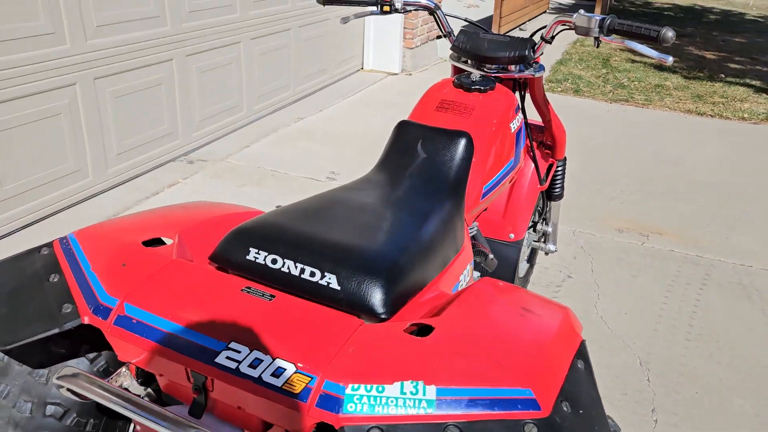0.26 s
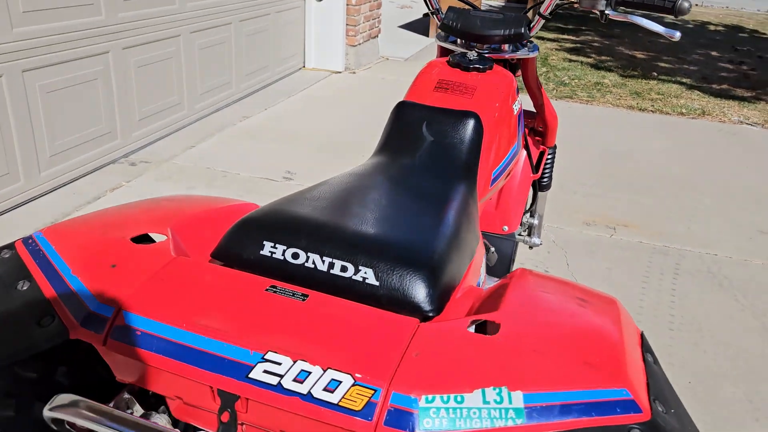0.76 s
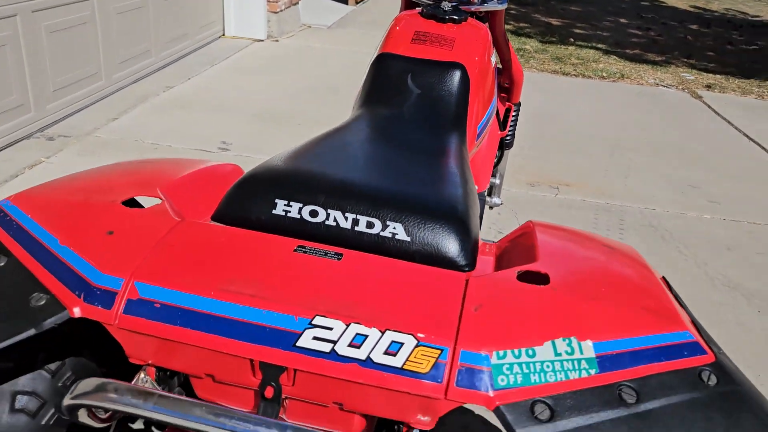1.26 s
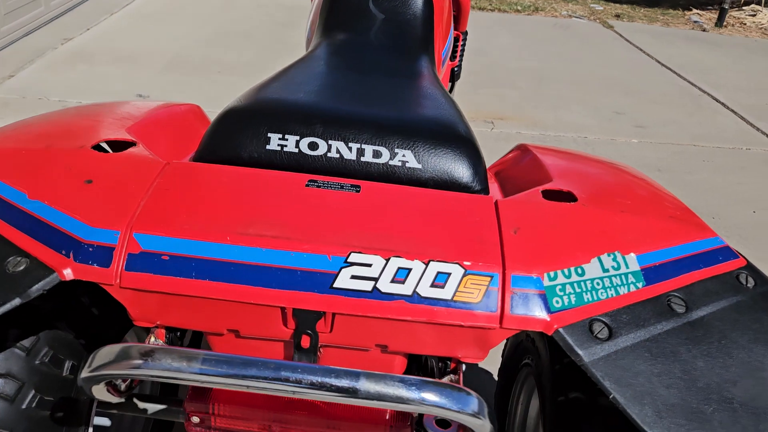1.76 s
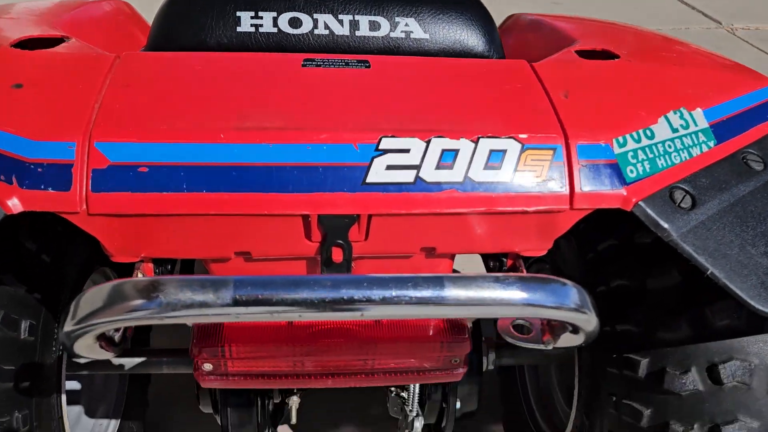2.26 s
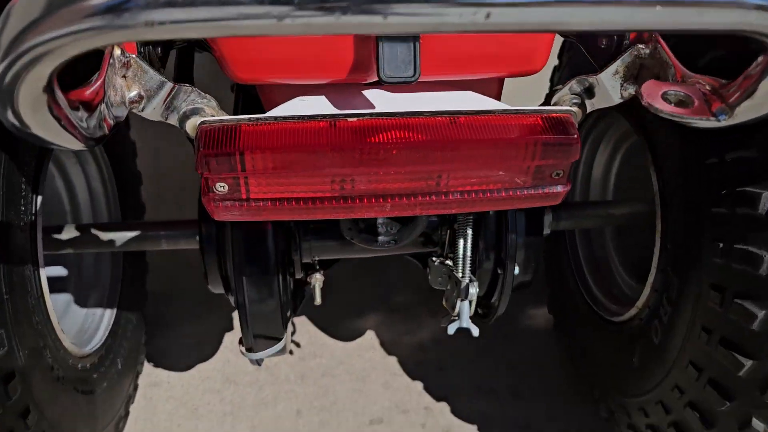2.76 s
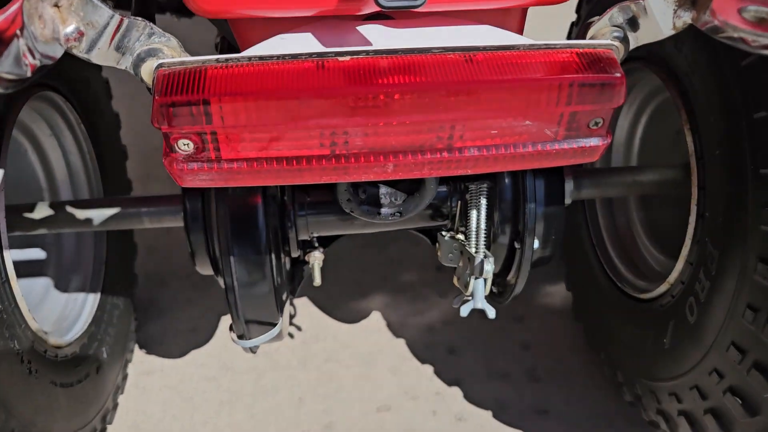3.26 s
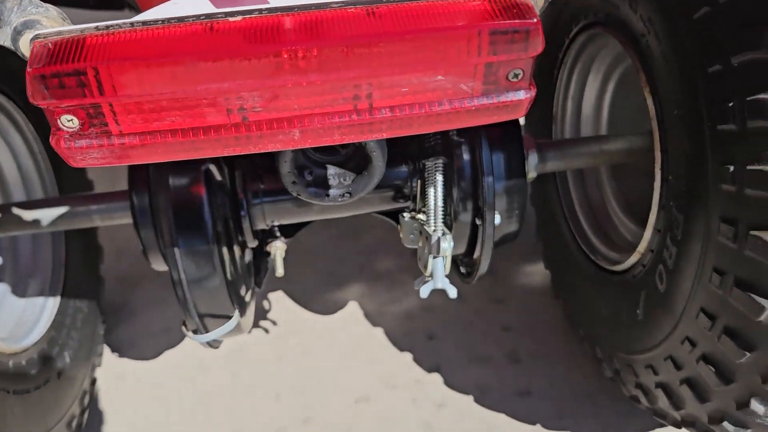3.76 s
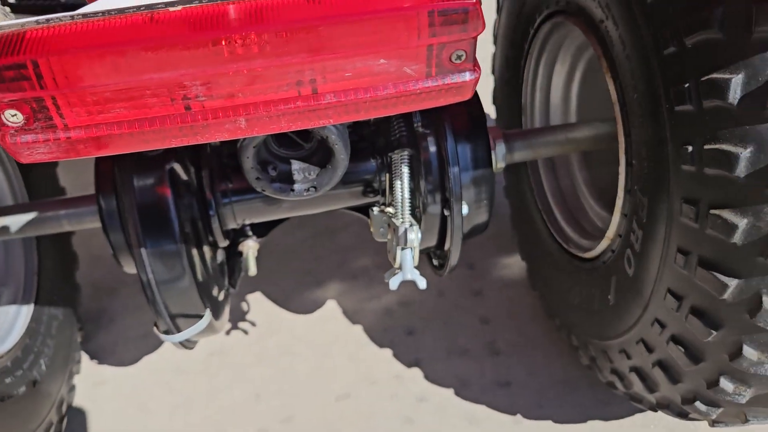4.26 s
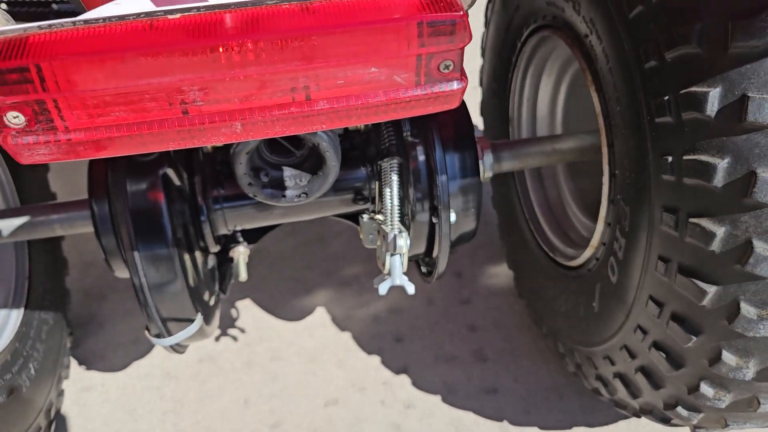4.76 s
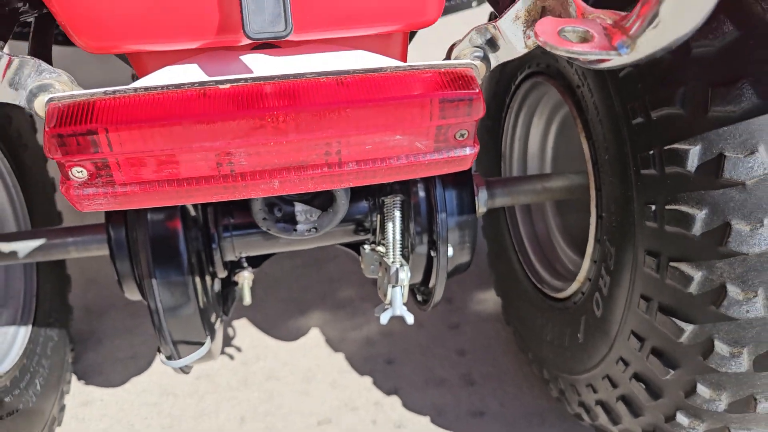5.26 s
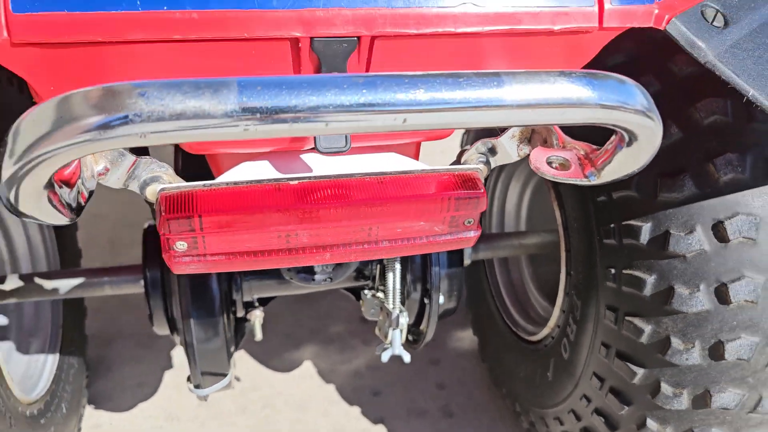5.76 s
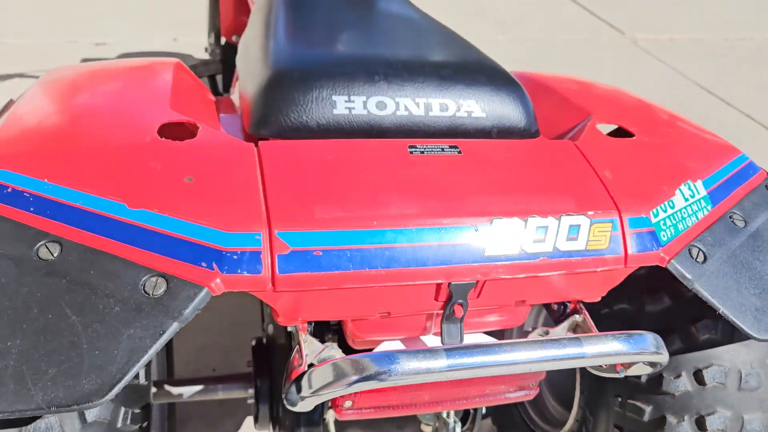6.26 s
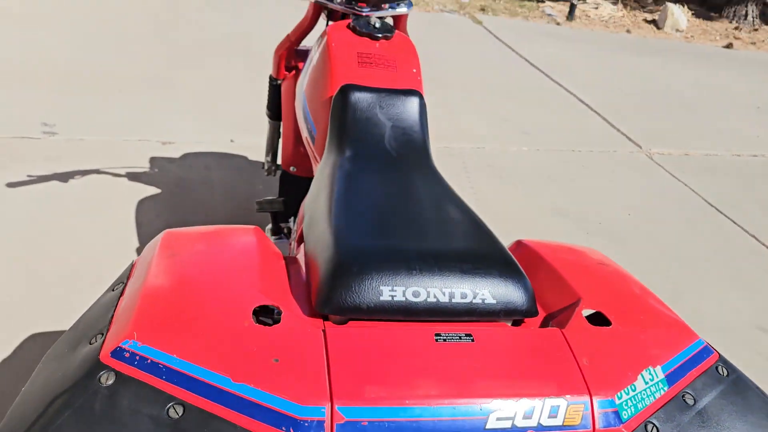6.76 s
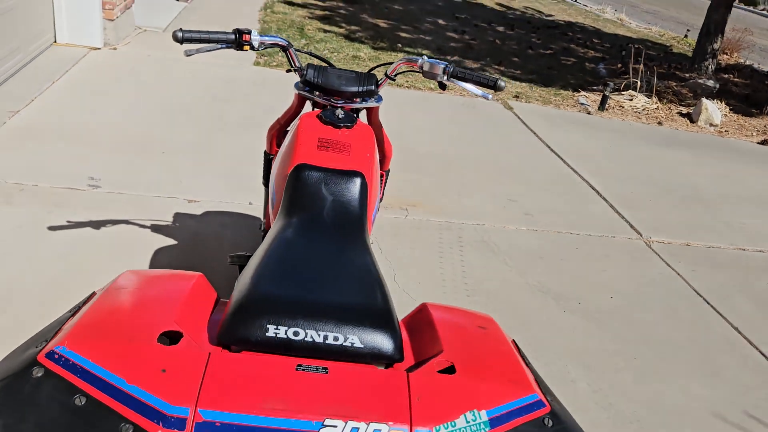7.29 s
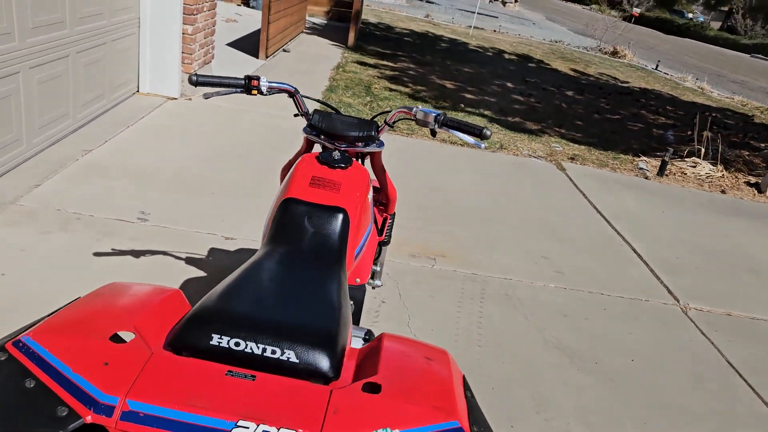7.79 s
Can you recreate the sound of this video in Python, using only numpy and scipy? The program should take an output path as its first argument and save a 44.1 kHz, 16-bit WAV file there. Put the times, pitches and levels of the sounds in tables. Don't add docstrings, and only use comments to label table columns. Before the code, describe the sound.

A small single-cylinder four-stroke engine idles on a concrete drive, its exhaust puttering about thirteen times a second. Each stroke is a double puff with a burst of hiss, over a ticking valve gear and low case rumble. The handheld microphone dips low behind it, where the hiss and snap brighten, then pulls back up. A few uneven strokes pop softly. A faint deep breeze lies beneath.

```python
import sys
import numpy as np
from scipy import signal
from scipy.fft import rfft, irfft, next_fast_len
from scipy.io import wavfile
from scipy.ndimage import uniform_filter1d, map_coordinates

SR = 44100
rng = np.random.default_rng(int(sys.argv[2]) if len(sys.argv) > 2 else 0)


def gain_from_decibels(decibels):
    exponent = np.asarray(decibels, float) / 20
    return 10 ** exponent


def master(y):
    cut = np.clip(np.atleast_2d(y).T, -1, 1)
    pcm = np.round(cut * 32767)
    wavfile.write(sys.argv[1], SR, pcm.astype(np.int16))


N = 354123


def unit(x):
    return x / np.sqrt(np.mean(x ** 2) + 1e-20)


def along(points, hz):
    point_hz, value = np.transpose(points)
    return np.interp(np.log(hz + 1), np.log(point_hz + 1), value)


def filtered(x, response):
    size = next_fast_len(N + SR // 2)
    spectrum = rfft(x, size) * response(np.fft.rfftfreq(size, 1 / SR))
    return irfft(spectrum, size)[..., :N]


def impulses(seconds, sizes):
    at = np.asarray(seconds) * SR
    whole = at.astype(int)
    part = at - whole
    shares = np.r_[sizes * (1 - part), sizes * part]
    return np.bincount(np.r_[whole, whole + 1], shares, N + SR)[:N]


# pitch_hz, share of power 0-1
COMMON_NOISE = [(100, 0.98), (600, 0.66), (1400, 0.69), (3000, 0.057), (15000, 0.067)]


def rush(spectrum):
    common, left, right = rng.standard_normal((3, N))
    share = lambda hz: np.clip(along(COMMON_NOISE, hz), 0, 1)
    colour = lambda hz: gain_from_decibels(along(spectrum, hz))
    same = filtered(common, lambda hz: colour(hz) * np.sqrt(share(hz)))
    own = filtered(np.array([left, right]), lambda hz: colour(hz) * np.sqrt(1 - share(hz)))
    return unit(same + own)


def wobble(rate):
    knots = rng.standard_normal(int(N * rate / SR) + 4)
    return map_coordinates(knots, [np.arange(N) * rate / SR])


def banded(x, depth_db):
    width_hz, life_s = 60, .12
    hz, t, z = signal.stft(x, SR, nperseg=2048)
    field = rng.standard_normal(z.shape[1:])
    field = uniform_filter1d(field, round(width_hz / hz[1]), 0)
    field = uniform_filter1d(field, round(life_s / t[1]), 1)
    return unit(signal.istft(z * gain_from_decibels(depth_db * unit(field)), SR, nperseg=2048)[1][:, :N])


def ring(times, sizes_db, modes, scatter_db, rise_s, unlike):
    t, out = np.arange(SR // 8) / SR, np.zeros((2, N))
    chance = rng.standard_normal((len(times), len(modes)))
    shift = unlike * rng.standard_normal(len(modes))
    for k, (hz, db, t60) in enumerate(modes):
        blows = impulses(times, gain_from_decibels(sizes_db + db + scatter_db * chance[:, k]))
        envelope = gain_from_decibels(-60 * t / t60) * (1 - np.exp(-t / rise_s))
        mode = envelope * np.sin(2 * np.pi * hz * t + [[0], [shift[k]]])
        out += signal.oaconvolve(blows[None], mode, axes=1)[:, :N]
    return out


# time_s, nearness_db, line of sight into the tail_db, top pipe modes past the fender_db
PHONE_MOVES = [(0, -.5, -2.5, 5), (.6, 0.5, -3, 2.3), (1.1, 0.44, -1.5, 0.3), (2, 1.08, -1, 1),
               (2.7, 1.5, 2, -1), (3.3, 1, 2, -1), (4.1, 0.5, 3, 2), (4.9, 0.2, 3, 1), (5.7, -0.2, 0, -0.5),
               (6.1, 0, -1.5, -3.5), (6.7, 0, -5, -8), (7.1, 0.1, -3.5, 1), (8.03, .7, -3, 6)]


def phone(seconds):
    s, *columns = np.transpose(PHONE_MOVES)
    return [np.interp(seconds, s, column) for column in columns]


# time_s, crank_turns_per_minute
IDLE_SPEED = [(0.0, 1569.8), (0.25, 1555.3), (1.34, 1365.8), (1.4, 1440.3), (2.06, 1498.3), (2.53, 1513.3),
              (2.53, 1564.4), (3.45, 1597.6), (3.46, 1577.6), (4.47, 1591.9), (4.88, 1567.5), (4.9, 1615.0),
              (5.67, 1542.1), (5.78, 1599.4), (6.43, 1595.6), (6.61, 1535.0), (7.4, 1526.7), (8.03, 1525.5)]
# start_s, level_db, weakness 0-1
WEAK_POPS = [
    (0.739, -8, 0.18),
    (1.579, -9.5, 0.74),
    (3.532, -18, 0.56),
    (5.196, -16, 0.26),
    (6.034, -35, 0.75),
    (6.334, -7.5, 0.95),
    (6.718, -8.5, 0.52),
    (7.344, -32, 0.4),
    (7.738, -36, 0.52),
]


def strokes():
    first_s, early_s, next_late_s = .0181, .00166, .00095
    t = np.arange(N) / SR
    cycles = np.cumsum(np.interp(t, *np.transpose(IDLE_SPEED))) / (120 * SR)
    cycles -= np.interp(first_s, t, cycles)
    s = np.interp(np.arange(int(cycles[-1]) + 1), cycles, t)
    pop_s, _, weakness = np.transpose(WEAK_POPS)
    weak = np.zeros(len(s))
    weak[np.searchsorted(s, pop_s) - 1] = weakness
    times = s - early_s * weak + next_late_s * np.roll(weak, 1)
    return times, 1000 * np.gradient(s), weak


def crank(lead_s):
    s = strokes()[0] - lead_s
    s = np.r_[2 * s[0] - s[1], s, 2 * s[-1] - s[-2]]
    return s, np.interp(np.arange(N) / SR, s, np.arange(len(s)))


# pitch_hz, level_db per Hz
AIR_COLOUR = [(15, -24), (30, 0), (40, 6), (55, -10), (90, -70.5)]


def breeze():
    return gain_from_decibels(-30 + 2.5 * wobble(1.04)) * rush(AIR_COLOUR)


# pitch_hz, level_db per Hz
CASE_COLOUR = [(30, -6), (139, -6.5), (201, -12), (248, -23.5), (368, -16), (519, -17), (792, -29),
               (904, -23), (2670, -33.5), (7470, -39), (12200, -47), (16500, -74)]


def case_rumble(near_db):
    drone = banded(rush(CASE_COLOUR), depth_db=3.1)
    return gain_from_decibels(-34 + 1.2 * near_db + 1.25 * wobble(30)) * drone


# start_s, peak_db
LOOSE_KNOCKS = [
    (6.203, -27),
]
# pitch_hz, level_db, t60_s
LOOSE_RING = [(6175, -8, .03), (7970, 0, .03), (8120, -3, .02)]


def loose_part():
    return ring(*np.transpose(LOOSE_KNOCKS), LOOSE_RING, scatter_db=-0.5, rise_s=0.0012, unlike=0.46)


# share of cycle 0-1, level_db
GEAR_TICKS = [(0.028, -3.5), (0.098, 2), (.24, 4), (.36, -4), (.46, 5), (.56, -3), (0.779, -1), (.9, -3)]
# pitch_hz, level_db, t60_s
ROCKER_RING = [(3700, -5, .05), (4330, -3, .07), (4420, 1.5, .08), (7340, -1.5, .07), (8050, -.5, .055)]
# pitch_hz, level_db, t60_s
COVER_RING = [(455, 2, .12), (915, 0, .05), (1085, 0, .045), (1360, -5, .05), (1540, -6, .05),
              (2250, -10, .06)]


def valve_gear(modes):
    starts = crank(.002)[0]
    share, db = np.transpose(GEAR_TICKS)
    chance = rng.standard_normal((len(starts) - 1, len(GEAR_TICKS), 2))
    times = starts[:-1, None] + np.diff(starts)[:, None] * (share + .03 * chance[..., 0])
    times = np.clip(times, 0, N / SR).ravel()
    sizes_db = (db + 3.3 * chance[..., 1]).ravel()
    return unit(ring(times, sizes_db, modes, scatter_db=2.5, rise_s=.0012, unlike=.6))


# pitch_hz, level_db, t60_s
CAP_RING = [(5900, -1, .007), (6900, 0, .006)]


def tail_cap():
    s = strokes()[0]
    return unit(ring(s, 0 * s, CAP_RING, scatter_db=-0.5, rise_s=0.00057, unlike=1.3))


# share of cycle 0-1, level_db
TAIL_OUTFLOW = [(0, -13), (.006, 0.5), (.04, 0.5), (.18, -0.5), (.21, -5.5), (.32, -3.5), (.5, -13),
                (.58, -12), (.8, -9), (.97, -20)]
# pitch_hz, level_db per Hz
JET_COLOUR = [(1500, -27), (3000, -12.5), (4500, 3), (6000, 5.5), (8000, 5), (12000, 7.5), (16500, 0)]


def jet():
    turns = crank(0.00093)[1]
    share, db = np.transpose(TAIL_OUTFLOW)
    s, _, weak = strokes()
    each_db = -40 + phone(s)[1] - 7 * weak + .8 * rng.standard_normal(len(s))
    stroke_db = np.pad(each_db, (1, 2), "edge")[turns.astype(int)]
    hiss = banded(rush(JET_COLOUR), depth_db=2.2)
    return gain_from_decibels(np.interp(turns % 1, share, db) + stroke_db + 1.5 * wobble(250)) * hiss


GURGLE_GROWS = 1.6
# delay_s, level_db
PRESSURE_FRONTS = [(.0065, -36.5), (.0145, -38.5), (.0215, -36.5)]
# pitch_hz, level_db, t60_s
BARK_RING = [(918, 0, .042), (1083, 1.5, 0.043), (1360, -2.5, 0.032), (1551, -3, .03), (2100, -9, 0.022)]


def bark():
    s = strokes()[0]
    delay_s, db = np.transpose(PRESSURE_FRONTS)
    sizes_db = db + GURGLE_GROWS * phone(s)[0][:, None]
    times = np.clip(s[:, None] + delay_s, 0, N / SR).ravel()
    return ring(times, sizes_db.ravel(), BARK_RING, scatter_db=2.2, rise_s=.0015, unlike=.5)


# pitch_hz, level_db per Hz
GURGLE_COLOUR = [(60, -10), (170, -3.5), (260, -25), (520, -9), (780, -17), (1100, -18), (1600, -22),
                 (2600, -26), (5000, -35.5)]


def gurgle(pressure):
    swing = uniform_filter1d(np.abs(pressure), 130)
    return unit((0.047 + swing) * gain_from_decibels(0.86 * wobble(40)) * rush(GURGLE_COLOUR))


# pitch_hz, level_db, t60_s
SILENCER_RING = [(164, -8.5, 0.023), (323, -9, 0.03), (423, -9.5, 0.045), (537, -0.5, 0.038),
                 (600, -12.5, 0.047)]


def silencer_pops():
    pop_s, pop_db, _ = np.transpose(WEAK_POPS)
    return ring(pop_s, pop_db, SILENCER_RING, scatter_db=1.5, rise_s=0.0055, unlike=0)


# time_s, place 0 above the rear, 1 low at the axle, 2 standing back
PHONE_PLACE = [
    (1.9, 0),
    (2.6, 1),
    (5.6, 1),
    (6.4, 2),
]
# pitch_hz, width_hz, signed blowdown drive, signed piston puff drive
PIPE_FROM_ABOVE = [(54, 20, 23.8, -6.35), (99, 118, -21.1, 5.67), (171, 39, 24.7, -16.46),
                   (189, 32, -19.9, 3.71), (213, 33, 20.0, 2.6), (304, 14, 4.2, 0.71),
                   (350, 38, 6.3, -0.11), (392, 41, -0.5, -1.0), (498, 36, -30.6, 0.49),
                   (535, 80, 13.5, -0.72), (615, 58, 3.6, 0.85), (695, 26, -18.8, -0.34),
                   (889, 14, -5.8, 0.23)]
PIPE_FROM_LOW = [(59, 21, 17.6, -7.41), (104, 97, -24.0, 6.91), (168, 44, 20.1, -10.88),
                 (183, 19, -14.2, 3.18), (221, 38, 5.6, 0.14), (294, 22, -2.1, 0.36),
                 (330, 14, 14.7, -1.23), (421, 90, 0.1, -1.25), (505, 31, -30.4, 1.19),
                 (547, 40, 24.2, -1.49), (644, 40, 5.6, 1.04), (709, 25, -21.0, -0.97),
                 (907, 14, -8.5, 0.16)]
PIPE_FROM_BACK = [(56, 19, 19.2, -10.14), (91, 71, -20.0, 6.81), (153, 38, 11.1, 4.38),
                  (173, 66, -6.6, -8.91), (217, 72, 9.6, 2.47), (343, 156, -6.2, -0.28),
                  (343, 75, 7.4, 0.56), (440, 18, 6.2, -0.47), (514, 45, -20.4, 0.53),
                  (547, 33, 25.5, -1.72), (634, 41, 7.5, 0.83), (682, 32, -10.4, -0.75),
                  (904, 14, -5.9, 0.46)]


def exhaust():
    s, cycle_ms, weak = strokes()
    place = np.interp(s, *np.transpose(PHONE_PLACE))
    near_db, _, fender_db = phone(s)
    chance = rng.standard_normal((len(s), 4)).T
    blow_db = near_db - 2.5 * weak + 0.067 * chance[0]
    lag_ms = 12.776 + 0.029 * (cycle_ms - 75) + 0.14 * (place > 1) - 0.44 * weak + .08 * chance[1]
    piston_db = blow_db + 5 * weak + 0.25 * chance[2]
    upper_db = 0.23 + 2.5 * weak + .5 * chance[3]
    f, out = np.fft.rfftfreq(2 ** 14, 1 / SR), np.zeros(N)
    puffs = ((s, blow_db, .0012), (s + lag_ms / 1000, piston_db, .00025))
    for k, (times, size_db, rise_s) in enumerate(puffs):
        puff = 1 / (1 + 2j * np.pi * f * rise_s) ** 2
        for here, modes in enumerate((PIPE_FROM_ABOVE, PIPE_FROM_LOW, PIPE_FROM_BACK)):
            weight = 10 * np.clip(1 - np.abs(place - here), 0, 1)
            parts = ((modes[:5], 0), (modes[5:10], upper_db), (modes[10:], upper_db + fender_db))
            for part, part_db in parts:
                pipe = sum(m[2 + k] * 1j * f * m[1] / (m[0] ** 2 - f * f + 1j * f * m[1]) for m in part)
                blows = impulses(times, weight * gain_from_decibels(size_db + part_db))
                out += signal.oaconvolve(blows, irfft(pipe * puff)[:SR // 8])[:N]
    return out


def scene():
    near_db, sight_db, _ = phone(np.arange(N) / SR)
    gurgle_db = -40.5 + GURGLE_GROWS * near_db
    putter = exhaust() + silencer_pops()
    gas = jet() + bark() + gain_from_decibels(gurgle_db) * gurgle(putter[0])
    cap = gain_from_decibels(-66.5 + 4.3 * sight_db) * tail_cap()
    rockers = gain_from_decibels(-52 + .3 * sight_db) * valve_gear(ROCKER_RING)
    covers = gain_from_decibels(gurgle_db - 13) * valve_gear(COVER_RING)
    steel = cap + rockers + covers + loose_part()
    return breeze() + case_rumble(near_db) + steel + gas + putter


def low_pass(x):
    return signal.sosfilt(signal.butter(12, 16970, fs=SR, output="sos"), x)


# pitch_hz, level_db
MIC_COLOUR = [(8300, 0), (9080, -6), (9640, -19), (10400, -10), (12200, -1), (13800, -5), (15100, -4),
              (15750, -5), (15900, -52), (16900, -60)]
# pitch_hz, left over right_db
PORT_DIFFERENCE = [(60, 1), (330, 1), (1790, 2), (4190, -0.5), (6410, -1.5), (8500, 4), (10500, 9.5),
                   (12000, -2.5), (13200, 7.5), (16000, 13)]


def record(dry):
    lead_s = 4.5 / 44100
    side = np.array([[.5], [-.5]])
    cut = lambda hz: np.maximum(1 / (1 + (65 / (hz + 1)) ** 4), .16)
    colour = lambda hz: gain_from_decibels(along(MIC_COLOUR, hz) + side * along(PORT_DIFFERENCE, hz))
    ports = lambda hz: cut(hz) * colour(hz) * np.exp(2j * np.pi * hz * side * lead_s)
    return low_pass(filtered(dry, ports))


dry = scene()
out = record(dry)
master(out)
```